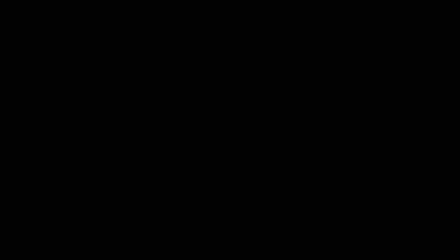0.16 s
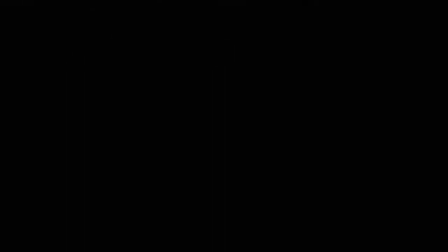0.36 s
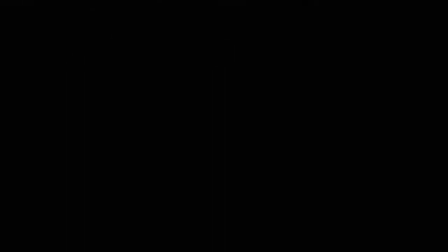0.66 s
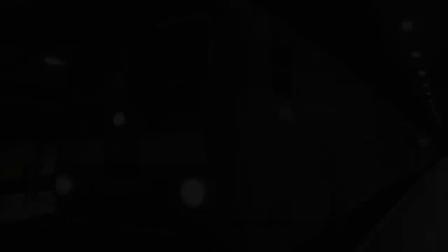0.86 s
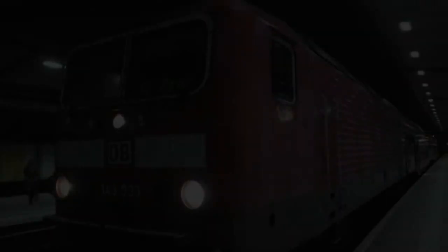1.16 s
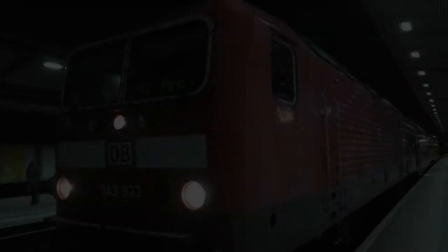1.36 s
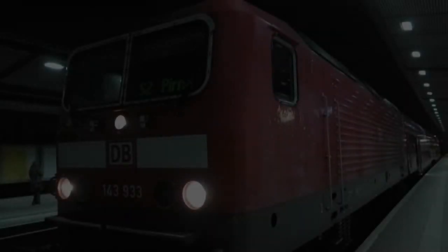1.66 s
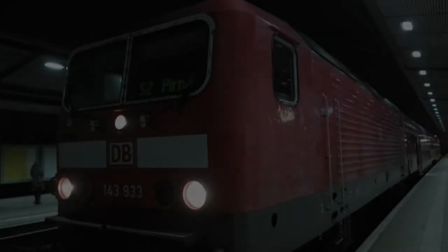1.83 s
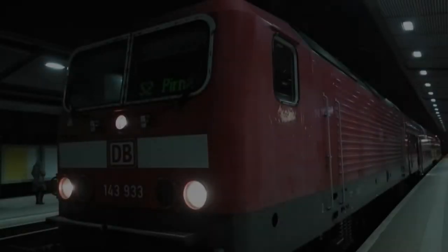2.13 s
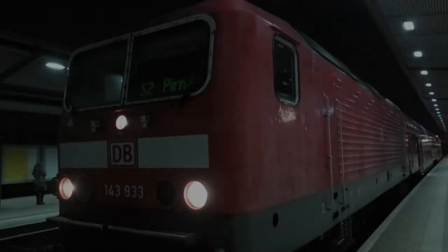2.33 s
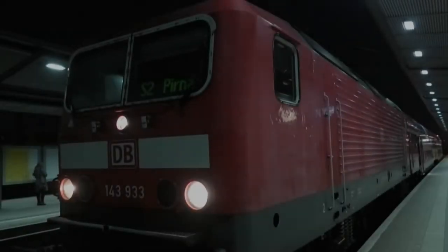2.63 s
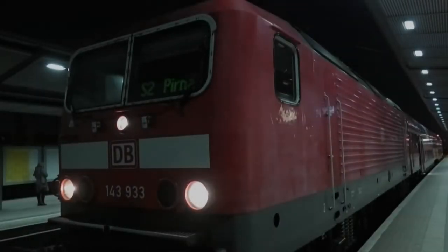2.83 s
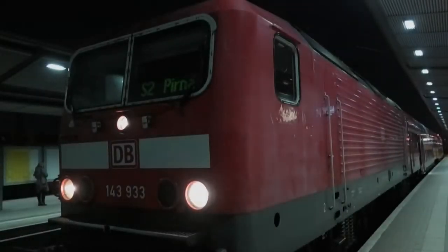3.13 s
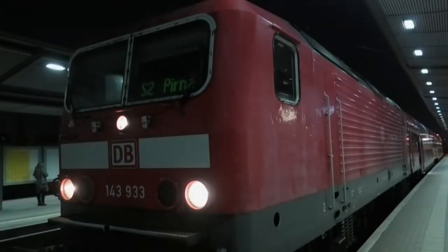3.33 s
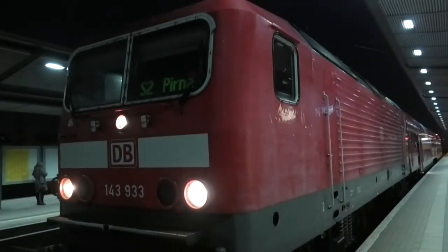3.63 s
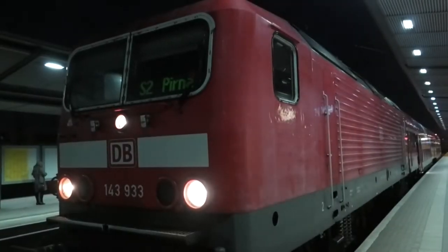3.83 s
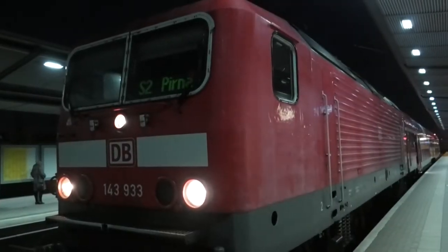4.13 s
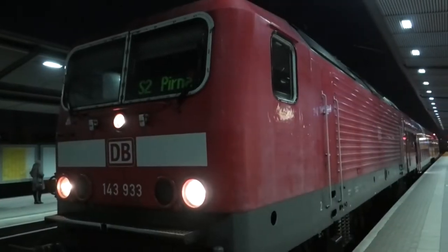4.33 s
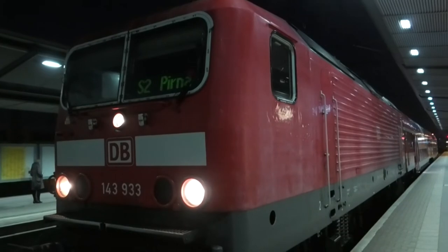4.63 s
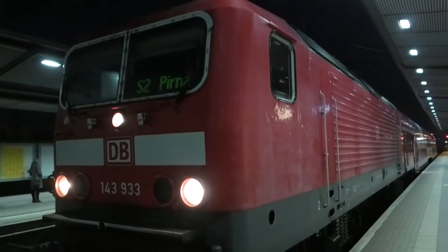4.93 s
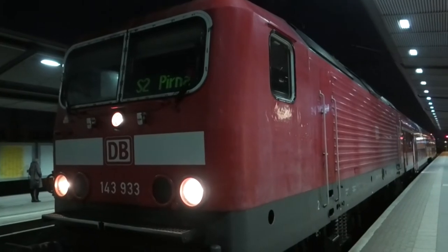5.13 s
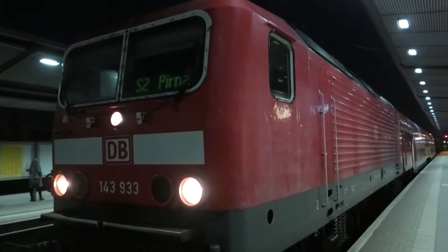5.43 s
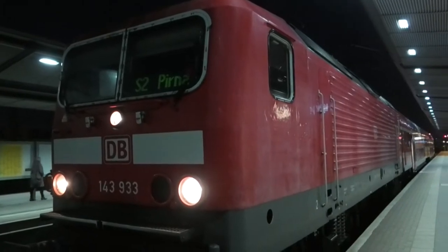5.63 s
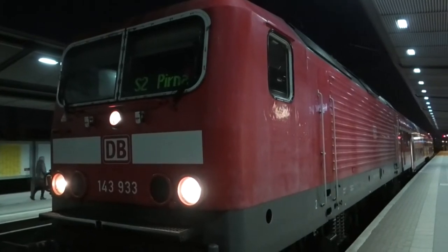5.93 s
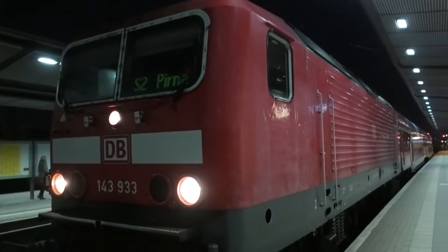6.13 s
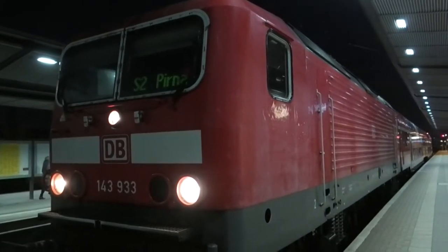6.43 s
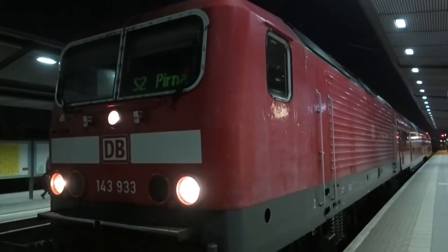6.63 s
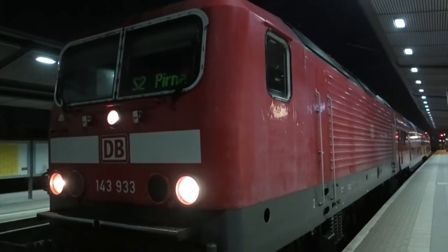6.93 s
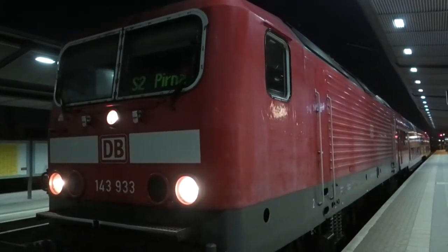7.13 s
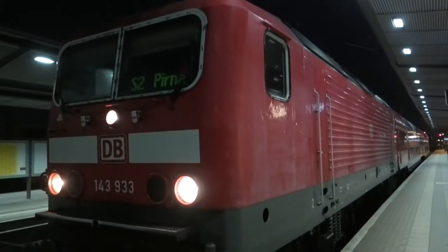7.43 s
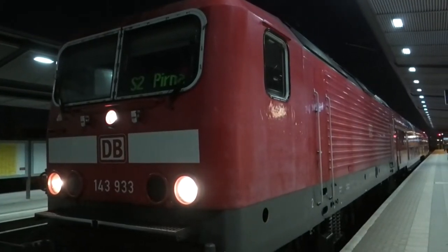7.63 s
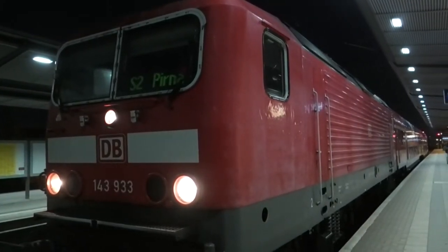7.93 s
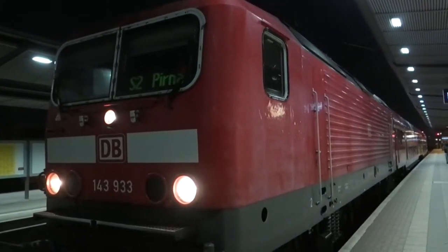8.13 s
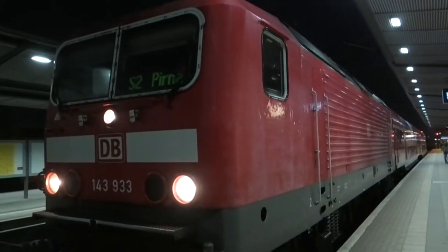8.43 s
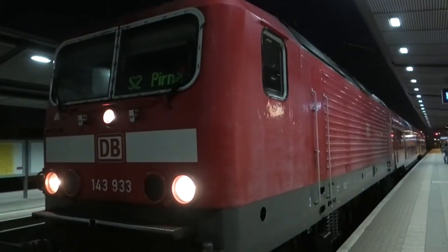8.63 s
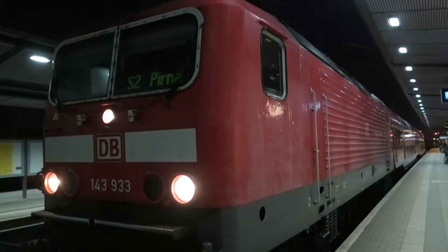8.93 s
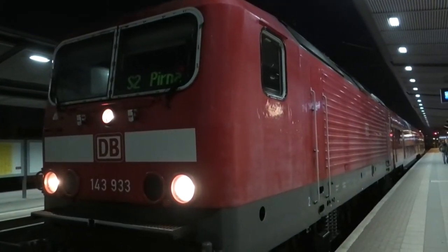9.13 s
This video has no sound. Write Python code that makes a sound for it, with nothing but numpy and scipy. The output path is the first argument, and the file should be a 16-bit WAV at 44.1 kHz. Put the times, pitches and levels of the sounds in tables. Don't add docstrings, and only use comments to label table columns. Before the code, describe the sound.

After a silent opening, the steady airy roar of an electric locomotive's cooling blowers fades in, with a faint wavering hum. Around two seconds a brake valve snaps open and a strong bright hiss of compressed air bursts out, dominating and slowly weakening to the end. Covered platform, close stereo camera microphone, whose gain dips under the hiss.

```python
import sys
import numpy as np
from scipy import signal
from scipy.io import wavfile
from scipy.ndimage import uniform_filter1d

SR = 44100
rng = np.random.default_rng(int(sys.argv[2]) if len(sys.argv) > 2 else 0)


def log_audio(samples):
    frames = np.atleast_2d(samples).T
    limited = np.clip(frames, -1, 1)
    pcm = np.round(limited * 32767).astype(np.int16)
    wavfile.write(sys.argv[1], SR, pcm)


def amplitude_ratio(level_db):
    exponent = np.asarray(level_db, float) / 20
    return 10 ** exponent


N = 408807


def read(hz, f, value):
    return np.interp(np.log(hz + 1), np.log(np.asarray(f) + 1), value)


def follow(rows):
    return np.interp(np.arange(N) / SR, *np.transpose(rows))


def evened(x):
    return x / np.sqrt(np.mean(x ** 2) + 1e-20)


def wander(rate_hz):
    noise = uniform_filter1d(rng.standard_normal(N), size=2000)
    pole = np.exp(-2 * np.pi * rate_hz / SR)
    return evened(signal.lfilter([1], [1, -pole], noise))


def airflow(shape, peaks, ripple_db, patchy_db):
    # f/Hz, left-right likeness/0-1, left minus right level/dB
    ports = [(25, .4, -12.5), (60, .74, -7.6), (160, .97, -4.3), (430, .8, -3), (700, .88, -1.7),
             (2000, .7, -2.2), (4600, .64, -2.7), (5500, .76, -2), (6000, .8, -.3), (7600, .85, -.3),
             (8600, .8, -1.4), (9300, .97, -2.4), (10700, .99, -4.1), (11800, .99, -2.5),
             (16000, .985, -2.6)]
    frames, hz = N // 1024 + 5, np.fft.rfftfreq(4096, 1 / SR)
    a, b, c, d, ripple, patches = rng.standard_normal((frames, 2049, 6)).T
    ripple = uniform_filter1d(ripple, size=3, axis=0)
    ripple = evened(uniform_filter1d(ripple, size=60, axis=1))
    patches = uniform_filter1d(patches, size=60, axis=0)
    patches = evened(uniform_filter1d(patches, size=6, axis=1))

    colour_db = read(hz, *np.transpose(shape))
    colour_db = colour_db + sum(db / (1 + (2 * (hz - f) / width) ** 2) for f, width, db in peaks)
    f, same, lean_db = np.transpose(ports)
    own = np.arccos(np.clip(read(hz, f, same), 0, 1))[:, None] / 2
    mid = np.cos(own) * (a + 1j * b)
    side = np.sin(own) * (c + 1j * d)
    lean = amplitude_ratio(read(hz, f, lean_db)[:, None] / 2)
    z = np.array([(mid + side) * lean, (mid - side) / lean])
    z *= amplitude_ratio(colour_db[:, None] + ripple_db * ripple + patchy_db * patches)
    return evened(signal.istft(z, nperseg=4096, noverlap=3072)[1][:, :N])


def swells_db():
    # t/s, peak level/dB, length/s
    swells = [(.9, 2.5, 0.23), (1.654, 3, 0.36), (2.364, 7, 0.33), (3.05, 1, .45), (3.657, 3.5, 0.74),
              (4.4, -1, 0.24), (4.83, 6, .55), (5.723, 1, 0.53), (6.35, 5.5, 0.28), (6.75, 0, 0.37),
              (7.07, 7, 0.16), (7.902, 2, 0.14), (8.29, 2, 0.17), (8.703, 3, 0.19), (9.15, -1, .3)]
    out_of_step_db = -5
    t = np.arange(0, N, 64) / SR
    bumps = sum(amplitude_ratio(db) ** 2 * np.exp(-(2 * (t - s) / length_s) ** 2) for s, db, length_s in swells)
    power = amplitude_ratio(out_of_step_db) ** 2 + bumps
    return np.interp(np.arange(N) / SR, t, 10 * np.log10(power))


def blowers():
    # f/Hz, density/dB per Hz
    roar_shape = [(60, -52), (110, -19), (190, -4), (363, -10.5), (600, -9), (1600, -10), (2000, -18),
                  (2350, -14.5), (3500, -21), (4500, -31), (6800, -37.5), (9000, -34.5), (12000, -45.5),
                  (14300, -54), (16000, -62)]
    # f/Hz, width/Hz, level/dB
    duct_peaks = [(127, 22, 6), (195, 40, 3.5), (248, 22, 5), (318, 22, 7), (436, 45, 4.5), (1000, 40, 3.5),
                  (1065, 60, 3), (1450, 150, 3), (1750, 60, 2.5), (570, 16, 3), (608, 36, 8.5),
                  (636, 10, -7), (651, 16, 7.5), (705, 15, 3), (1680, 30, -3)]
    # f/Hz, level/dB rms, left phase lead/rad, share of the beating/0-1
    blade_tones = [
        (430.7, -44, 1.05, 1.),
        (861.3, -50.5, .4, .2),
    ]
    # t/s, level/dB
    load = [
        (.7, -2),
        (1.3, 0),
        (3, 0),
        (3.7, -0.5),
        (6.8, -2.16),
        (8.2, -1.3),
        (9.27, -.5),
    ]
    roar_db = -33
    sound = amplitude_ratio(roar_db) * airflow(roar_shape, duct_peaks, ripple_db=1.2, patchy_db=.7)
    beating_db = swells_db()
    speed = 1 + .004 * wander(4.0)
    for hz, db, lead, share in blade_tones:
        turn = 2 * np.pi * np.cumsum(hz * speed) / SR + np.array([[lead], [0]])
        eddies = .45 * (wander(5.0) + 1j * wander(5.0))
        scatter = .2 * np.array([wander(3.0) + 1j * wander(3.0) for port in range(2)])
        level = amplitude_ratio(db + share * beating_db + np.array([[-1.5], [1.5]]))
        sound = sound + level * ((1 + eddies + scatter) * np.exp(1j * turn)).real
    return amplitude_ratio(follow(load)) * sound


def outflow_db():
    open_s, snap_s = 2.004, .05
    leak_db, leak_rise_db_per_s = -65, 40
    air_db, settle_db, settle_s = -25, -2.5, 0.27
    empty_s, sag_db = 3.26, -6.
    hump_full_db, hump_sag_db, hump_lag = 1.24, -2.5, 4.1

    since_s = np.arange(N) / SR - open_s
    after_s = np.maximum(since_s, 0)
    drained = 1 - np.exp(-(after_s / empty_s) ** 2)
    flow_db = air_db + settle_db * np.exp(-after_s / settle_s) + sag_db * drained
    seep_db = leak_db + leak_rise_db_per_s * np.minimum(since_s, 0)
    opened = 1 - (1 - np.clip(after_s / snap_s, 0, 1)) ** 3
    jet_db = seep_db + opened * (flow_db - seep_db)
    return jet_db, hump_full_db + hump_sag_db * drained ** hump_lag


def valve():
    # f/Hz, density/dB per Hz
    jet_shape = [(300, -33), (1000, -15.5), (2000, -8), (3500, -5), (5300, -3.5), (7200, -4.5),
                 (7700, -3.5), (9000, -3), (10600, -1), (12000, -4.5), (13300, -4.5), (14100, -6),
                 (14800, -10.5), (16000, -5.5)]
    # f/Hz, width/Hz, level/dB
    reflection_peaks = [(2725, 25, 3.5), (3958, 22, 4), (4232, 30, 3), (5169, 28, 4.5), (5341, 30, 2),
                        (5630, 28, 3.5), (5914, 24, 3.5), (7654, 40, 2.5), (8065, 22, 3), (9757, 40, 2),
                        (10130, 30, 2), (10650, 120, 2.5)]
    # delay/ms, share of direct sound
    echoes = [
        (.7, 0.0067),
        (1.9, 0.032),
        (4.4, 0.077),
        (5.9, 0.079),
        (8.3, 0.064),
    ]
    level_db, hump_db = outflow_db()
    jet = airflow(jet_shape, reflection_peaks, ripple_db=2.0, patchy_db=0.3)
    jet = jet * amplitude_ratio(level_db + 0.26 * wander(7.5))
    hump_band = signal.butter(1, [9000, 12000], "bandpass", fs=SR, output="sos")
    jet = jet + (amplitude_ratio(hump_db) - 1) * signal.sosfilt(hump_band, jet)
    paths = np.zeros(512)
    paths[0] = 1
    for ms, share in echoes:
        paths[round(ms * SR / 1000)] = share
    return signal.oaconvolve(jet, paths[None] / np.linalg.norm(paths), axes=1)[:, :N]


def rumble():
    # f/Hz, density/dB per Hz
    rumble_shape = [(15, -2), (30, -17), (48, -4), (65, -1), (88, -7.5), (120, 0), (200, -17), (400, -60)]
    # t/s, level/dB rms
    draught = [
        (.7, -53.5),
        (1.4, -59),
        (2.4, -49.5),
        (4, -50.5),
        (5.5, -56),
        (6.8, -56.5),
        (9.27, -61),
    ]
    return amplitude_ratio(follow(draught)) * airflow(rumble_shape, [], ripple_db=3.0, patchy_db=1.5)


def scene():
    return blowers() + valve() + rumble()


def narrow_stereo(x):
    # f/Hz, share of time mono/0-1
    mono_share = [(1700, 0), (2200, .1), (3000, .02), (5500, .03), (5900, .2), (6400, .8), (7100, .96),
                  (7700, .65), (8300, .04), (11400, .01), (12000, .07), (13300, .07), (14000, .02),
                  (15500, .15)]
    edge_hz = 15730
    hz, t, (mid, side) = signal.stft([x[0] + x[1], x[0] - x[1]], SR, nperseg=1024)
    draws = rng.standard_normal((66, len(t) // 3 + 1))
    chance = uniform_filter1d(draws[:65], size=4, axis=0)
    chance = evened(uniform_filter1d(chance, size=2, axis=1))
    chance = 1 / (1 + np.exp(-1.7 * chance))
    band = np.arange(513) // 8
    mono = read(hz[band * 8], *np.transpose(mono_share))[:, None]
    keep = chance.repeat(3, axis=1)[band, :len(t)] > mono
    step_db = -5.0 * np.maximum(draws[65] - .3, 0).repeat(3)[:len(t)]
    side = keep * amplitude_ratio(np.outer(hz > 11400, step_db)) * side
    pair = signal.istft(np.array([mid + side, mid - side]) / 2, nperseg=1024)[1][:, :N]
    lowpass = signal.firwin(2047, edge_hz, window=("kaiser", 9), fs=SR)
    return signal.oaconvolve(pair, lowpass[None], "same")


def roll_off(x):
    return signal.sosfilt(signal.butter(12, 16730, fs=SR, output="sos"), x)


def record(dry):
    smooth_s, recovery_db_per_s, threshold_db = .06, 2.0, -33
    fade_start_s, fade_s = .733, 3.24
    pole = np.exp(-1 / (smooth_s * SR))
    power = signal.lfilter([1 - pole], [1, -pole], (dry ** 2).mean(0))
    power_db = 10 * np.log10(power + 1e-12)
    fall_db = np.arange(N) * recovery_db_per_s / SR
    held_db = np.maximum.accumulate(power_db + fall_db) - fall_db
    over_db = np.maximum(held_db - threshold_db, 0)
    ducked = dry / amplitude_ratio(0.98 * uniform_filter1d(over_db, size=1500) - 3.0)
    fade = np.clip((np.arange(N) / SR - fade_start_s) / fade_s, 0, 1)
    return roll_off(narrow_stereo(ducked) * fade * amplitude_ratio(0.39))


dry = scene()
out = record(dry)
log_audio(out)
```